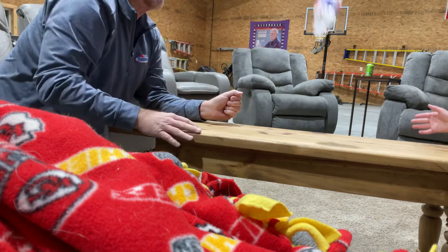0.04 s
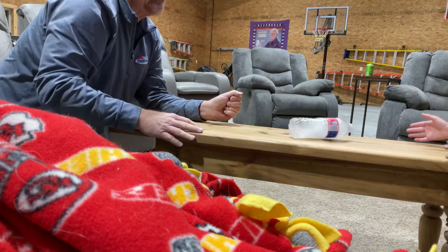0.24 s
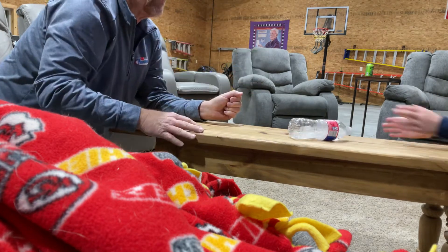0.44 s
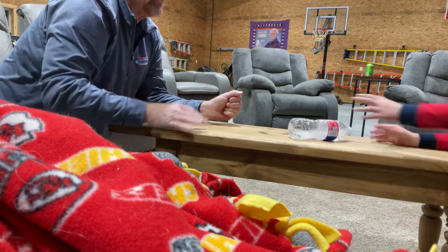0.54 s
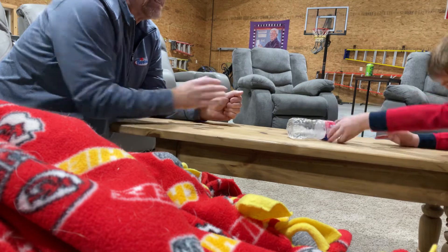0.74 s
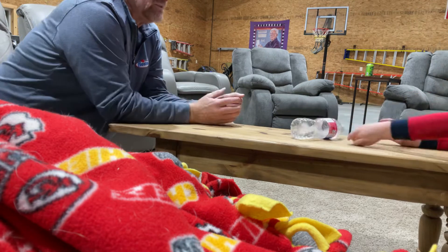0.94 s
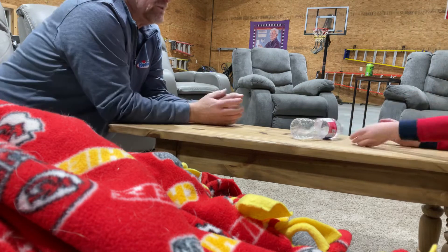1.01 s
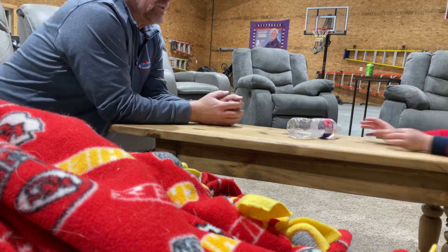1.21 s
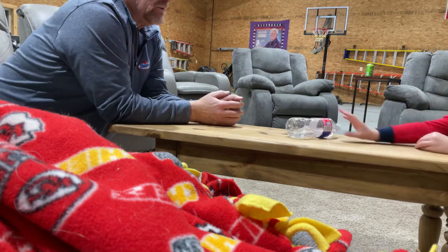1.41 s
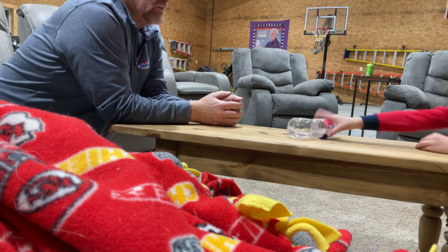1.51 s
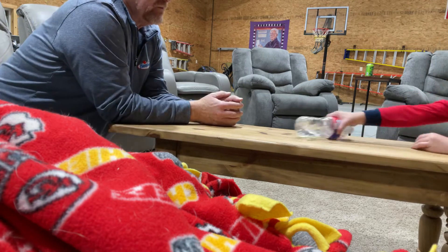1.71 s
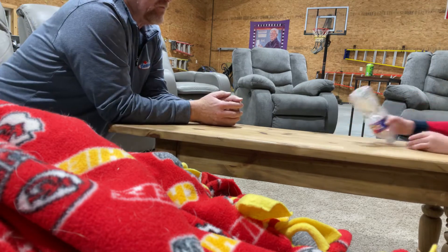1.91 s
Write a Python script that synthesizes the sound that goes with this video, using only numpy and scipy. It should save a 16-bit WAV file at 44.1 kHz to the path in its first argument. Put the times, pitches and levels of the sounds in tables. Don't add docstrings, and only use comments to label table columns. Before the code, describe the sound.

A fading echo of an earlier plastic crackle opens over faint room hum. At about 0.24 seconds a thin plastic bottle smacks a wooden table, loud, woody and crackly, ringing through a large hall. Soft hand thump near 0.6; bright plastic crinkles at 0.78-0.92, sharpest around 0.9; a two-part pop at 1.26; more quick snaps from 1.65 to 1.75, a faint last click at 1.94.

```python
import sys
import numpy as np
from scipy import signal
from scipy.fft import rfft, irfft
from scipy.io import wavfile

SR = 44100
rng = np.random.default_rng(int(sys.argv[2]) if len(sys.argv) > 2 else 0)


def how_loud(loudness_db):
    steps = np.asarray(loudness_db, float) / 20
    return 10 ** steps


def wrap_up_sound(samples):
    columns = np.atleast_2d(samples).T
    tamed = np.clip(columns, -1, 1)
    steps = np.round(tamed * 32767).astype(np.int16)
    wavfile.write(sys.argv[1], SR, steps)


N = 85995
LEAD_IN = int(0.4 * SR)
TOTAL = N + LEAD_IN

# frequency in Hz, level in dB.
HUM_COLOUR = [(40, 15), (80, 8.5), (200, 0), (500, -4.5), (1500, 1.5), (4000, -2), (9000, -18),
              (16000, -30)]
# frequency in Hz, level in dB, T60 in seconds.
HALL_TAIL = [(108, -17, 1), (246, 0.5, 1.5), (430, 2.5, 0.86), (990, -8, 2.09), (2310, 0.5, 1.2),
             (5560, 4.5, 0.85), (10970, -0.5, 0.55), (15800, -12, 0.4)]
# delay in ms, level in dB.
SURFACE_SLAPS = [
    (10, -19),
    (24.3, -8),
    (54, -19),
    (63, -22),
    (81, -19),
]
# frequency in Hz, width in octaves.
COLOUR_BLUR = [(500, .2), (4000, .7)]
# start in seconds, level in dB, frequency in
# Hz, T60 in seconds.
TABLE_THUMPS = [
    (.244, -24.5, 112, 0.11),
    (0.614, -27.5, 134, 0.2),
    (.925, -40, 78, 0.11),
    (1.256, -39.5, 112, 0.068),
    (1.562, -49, 97.7, 0.3),
]
# frequency in Hz, level in dB, T60 in seconds.
TABLE_MODES = [(209.6, -14, 0.27), (286, -8.5, 0.12), (407.5, -14.5, 0.3), (462, -5, 0.042),
               (596, -6.5, 0.067), (814, -0.5, 0.028), (997, 0.5, 0.024), (1234, -0.5, 0.081),
               (1777, -1.5, 0.042), (1860, -6.5, 0.042), (2113, 4.5, 0.018), (2870, -32, 0.0043)]
# delay in ms, level in dB.
LANDING_PUSHES = [
    (0, -1),
    (2.4, 3.5),
    (4.4, 4),
]
# frequency in Hz, level in dB, T60 in seconds.
BODY_MODES = [(445, -11, .03), (1100, -5, .022)]
# frequency in Hz, level in dB, T60 in seconds.
SHELL_MODES = [(3400, -13, .004), (4650, -8, .006), (5900, -13, .003), (7000, -11, .003), (7900, -5, .004),
               (8700, -3, .004), (9700, 0, .005), (10600, -2, .004), (12100, -6, .003), (13500, -10, .002),
               (15000, -14, .002)]
# start in seconds, length in ms.
DENT_TIMES = [(.7826, 5), (.7892, 3), (.8036, 5), (.8135, 2), (.8243, 3.5), (.8536, 1.5), (.9152, 2),
              (1.2558, 2), (1.2606, 2.8), (1.6483, 1), (1.650, 2), (1.6786, 2.4), (1.695, 1.2), (1.7025, 3),
              (1.7188, 2), (1.7485, 1.8), (1.940, 2.5)]
# level in dB, brightest frequency in Hz, body share in dB,
# body frequency in Hz, share sent to the hall in dB.
DENT_TONES = [(-18.5, 16000, -13, 2100, 5), (-18.5, 28000, -9.5, 960, -11), (-17.5, 3900, -17, 2300, 0),
              (-38, 21000, 9, 1200, -2), (-25.5, 21000, -3.5, 1640, 10.5), (-18.5, 5900, -10.5, 2330, -2),
              (-3.5, 12800, -11.5, 1986, -2.5), (-25, 5000, -12, 1480, 3), (-10.5, 5900, -12, 1987, -2.5),
              (-16.5, 7000, -20.5, 2500, 9.5), (-12, 8100, -28, 1940, 4), (-11.5, 6100, -18, 1840, -9),
              (-24, 4000, -4.5, 1540, 5), (-20.5, 3800, -8, 2200, -1), (-21, 4200, -6, 1410, -1.5),
              (-16, 6800, -12, 2000, 1.5), (-26.5, 5800, -16, 2300, 0)]


def filtered(x, order, hz, kind="lowpass"):
    return signal.sosfilt(signal.butter(order, hz, kind, fs=SR, output="sos"), x)


def colour(points, column, hz):
    p = np.array(points)
    return np.interp(np.log(hz), np.log(p[:, 0]), p[:, column])


def peak(x, db):
    return x * how_loud(db) / np.abs(x).max()


def add(out, start_s, x):
    i = LEAD_IN + int(start_s * SR)
    out[i:i + len(x)] += x[:TOTAL - i]


def ring(strike, modes, spread_db=0.0, detune=0.0):
    chance = rng.standard_normal((len(modes), 2))
    out = 0
    for (hz, db, t60), (a, b) in zip(modes, chance):
        mode_hz = min(hz * (1 + detune * a), 0.45 * SR)
        pole = np.exp(2j * np.pi * mode_hz / SR - np.log(1000) / (t60 * SR))
        out = out + how_loud(db + spread_db * b) * signal.lfilter([1], [1, -pole], strike).imag
    return out


def hum():
    hz = np.fft.rfftfreq(N, 1 / SR) + 1
    x = irfft(rfft(rng.standard_normal(N)) * how_loud(colour(HUM_COLOUR, 1, hz)), N)
    return x * how_loud(-54) / x.std()


def hall_tail():
    level_db, build_ms, onset_ms = -35.5, 49, 4
    t = np.arange(TOTAL) / SR
    f = np.fft.rfftfreq(TOTAL, 1 / SR) + 1
    noise = rfft(rng.standard_normal(TOTAL))
    tail = 0
    for hz in 60 * 2 ** (np.arange(25) / 3):
        band = np.cos(np.clip(np.log2(f / hz) * 3, -1, 1) * np.pi / 2) ** 2
        fade_db = colour(HALL_TAIL, 1, hz) - 60 * t / colour(HALL_TAIL, 2, hz)
        tail = tail + irfft(noise * band, TOTAL) * how_loud(fade_db)
    build = 1 - np.exp(-np.maximum(t * 1000 - onset_ms, 0) / build_ms)
    return tail * how_loud(level_db) * build


def surface_slaps():
    smear_ms = 2.0
    response = np.zeros(6000)
    for ms, db in SURFACE_SLAPS:
        smear = rng.standard_normal(600) * 0.15 * np.exp(-np.arange(600) / SR * 1000 / smear_ms)
        smear[0] = 1
        i = int(ms * SR / 1000)
        response[i:i + 600] += how_loud(db) * smear / np.sqrt(np.sum(smear ** 2))
    return response


def spread(x):
    power = np.cumsum(np.abs(rfft(x, 16384)) ** 2)
    k = np.arange(len(power))
    half = 2 ** (colour(COLOUR_BLUR, 1, (k + 1) * SR / 16384) / 2)
    lo = k / half - 1
    hi = np.minimum(k * half + 1, k[-1])
    mean = (np.interp(hi, k, power) - np.interp(lo, k, power)) / (hi - lo)
    return np.roll(irfft(np.sqrt(mean)), 512)[:4096]


def thump(db, hz, t60):
    push = np.zeros(12000)
    push[:400] = np.hanning(400)
    push = push * rng.uniform(0.38, 1, 12000)
    return peak(ring(push, [(hz, 0, t60), (hz * 1.3, -3, t60 * 2.1)]), db)


def snaps(length_ms, first):
    snaps_per_ms, spread_db = 12, 4.0
    when, size, side = rng.random((3, 2048))
    t_ms = np.arange(2048) / SR * 1000
    hit = when < snaps_per_ms * 1000 / SR
    level = how_loud(-spread_db * np.log(size + 0.05) - 9)
    x = hit * level * np.sign(side - 0.5) * np.exp(-(t_ms / length_ms) ** 2)
    x[0] = first
    return x


def dent(length_ms, db, bright_hz, body_db, body_hz, first=1.0):
    bright_db, bright_oct = 7.0, 0.4
    body_t60_s, push_ms = 0.014, 0.08
    x = snaps(length_ms, first)
    lifted = []
    for hz, mode_db, t60 in SHELL_MODES:
        lift_db = bright_db * np.exp(-(np.log2(hz / bright_hz) / bright_oct) ** 2)
        lifted.append((hz, mode_db + lift_db, t60))
    shell = filtered(ring(x, lifted, spread_db=1.5, detune=0.02), 2, 2600, "highpass")
    push = np.exp(-np.arange(2048) / SR * 1000 / push_ms) + 0.033 * x
    body = filtered(ring(push, BODY_MODES + [(body_hz, 0, body_t60_s)]), 4, 330, "highpass")
    return peak(shell, db) + peak(body, db + body_db)


def landing():
    level_db, crackle_db, push_ms = -2.5, -0.5, 0.55
    strike = np.zeros(12000)
    push = np.hanning(int(push_ms * SR / 1000) + 3)
    for ms, db in LANDING_PUSHES:
        i = int(ms * SR / 1000)
        strike[i:i + len(push)] += how_loud(db) * push
    y = peak(filtered(ring(strike, TABLE_MODES), 2, 160, "highpass"), level_db)
    y[30:2078] += dent(5.5, level_db + crackle_db, 5500, -17.0, 1430, first=0)
    return y


def scene():
    response, tail, air = surface_slaps(), hall_tail(), hum()
    # start in seconds, sound, share sent to the hall in dB
    hits = [(0.2364, landing(), 1.0)]
    hits.append((-0.3, dent(15.0, -10, 6500, -16.5, 1750), 0))
    for start_s, db, hz, t60 in TABLE_THUMPS:
        hits.append((start_s, thump(db, hz, t60), 4))
    for (start_s, ms), (db, hz, body_db, body_hz, hall_db) in zip(DENT_TIMES, DENT_TONES):
        hits.append((start_s, dent(ms, db, hz, body_db, body_hz), hall_db))

    direct, to_hall = np.zeros(TOTAL), np.zeros(TOTAL)
    for start_s, x, hall_db in hits:
        add(direct, start_s, x)
        add(to_hall, start_s - 512 / SR, how_loud(hall_db) * spread(x))

    low = filtered(direct, 1, 2000)
    slaps = signal.fftconvolve(direct - (1 - how_loud(-5)) * low, response)
    slaps = filtered(slaps, 2, 12000)
    far = signal.fftconvolve(to_hall, tail)
    return (direct[LEAD_IN:] + slaps[LEAD_IN:TOTAL] + far[LEAD_IN:TOTAL] + air)[None]


def roll_off(x):
    return signal.sosfilt(signal.butter(12, 17080, fs=SR, output="sos"), x)


def record(dry):
    x = filtered(dry, 4, 90, "highpass")
    x = filtered(x, 8, 15900)
    return roll_off(x)


dry = scene()
out = record(dry)
wrap_up_sound(out)
```